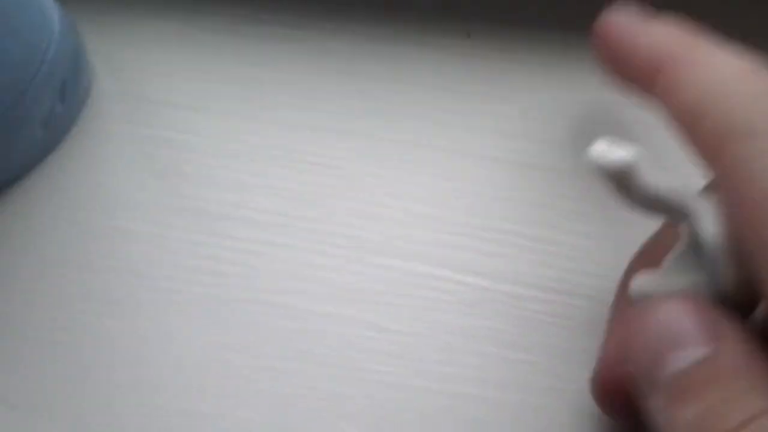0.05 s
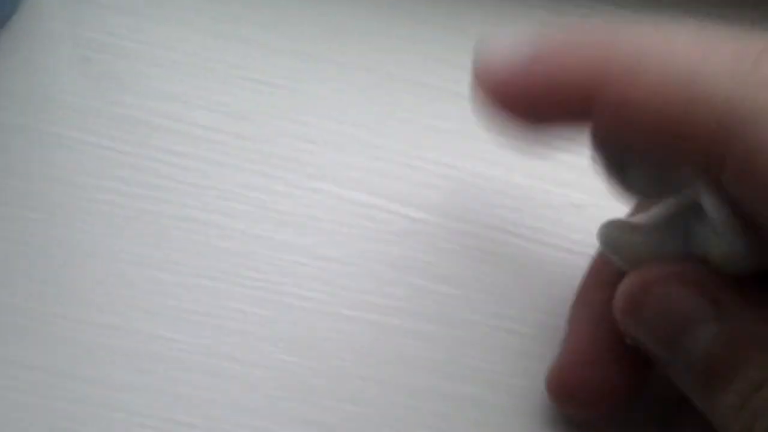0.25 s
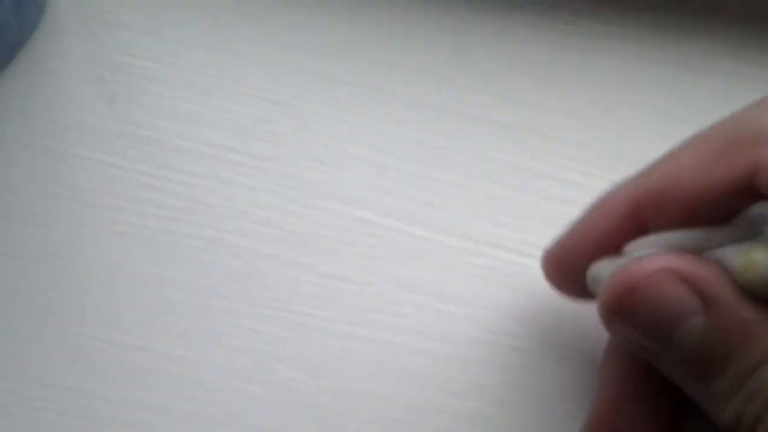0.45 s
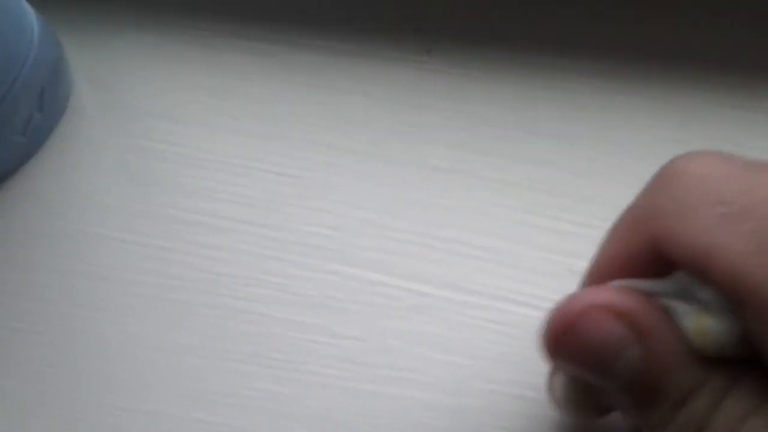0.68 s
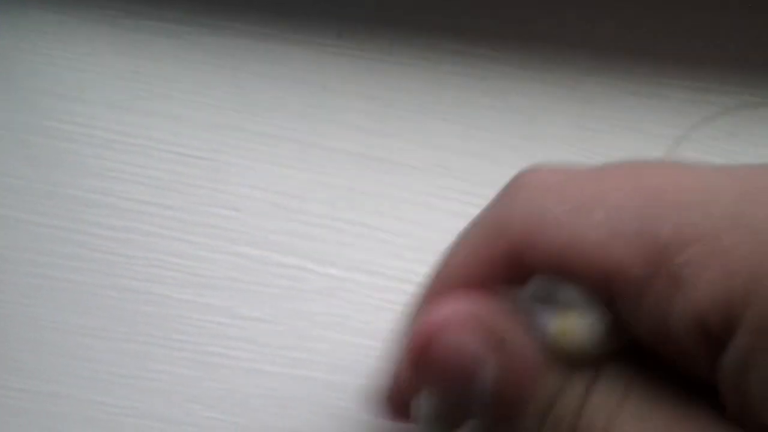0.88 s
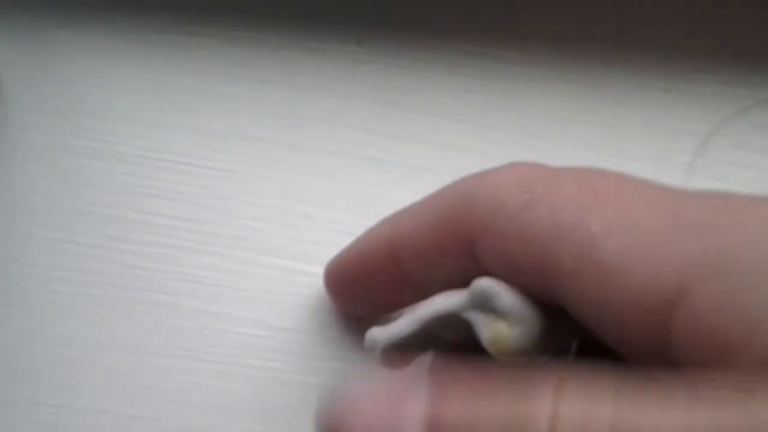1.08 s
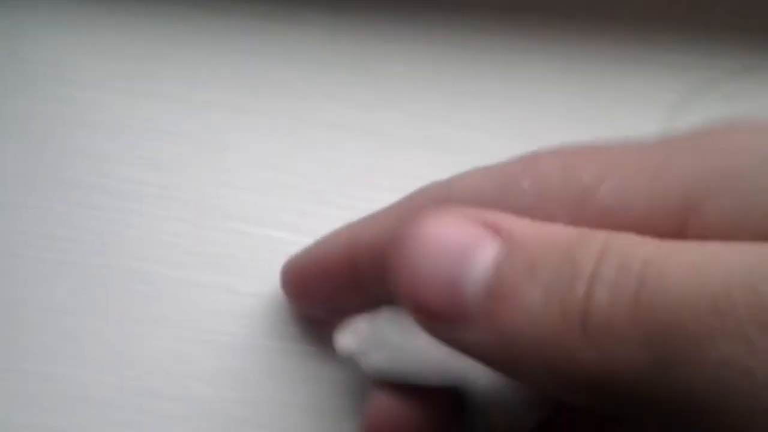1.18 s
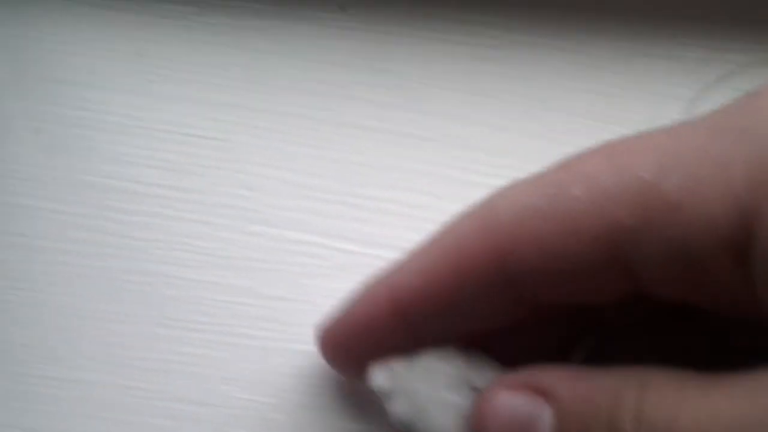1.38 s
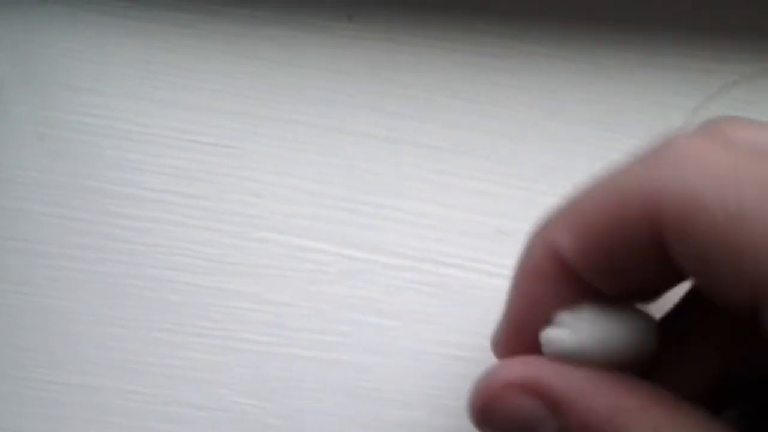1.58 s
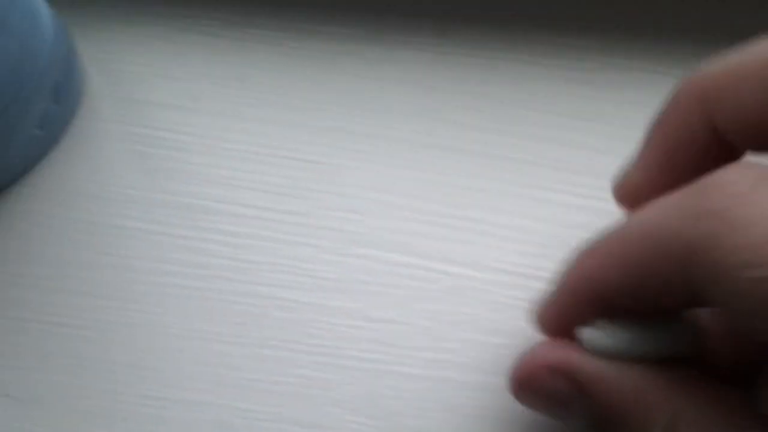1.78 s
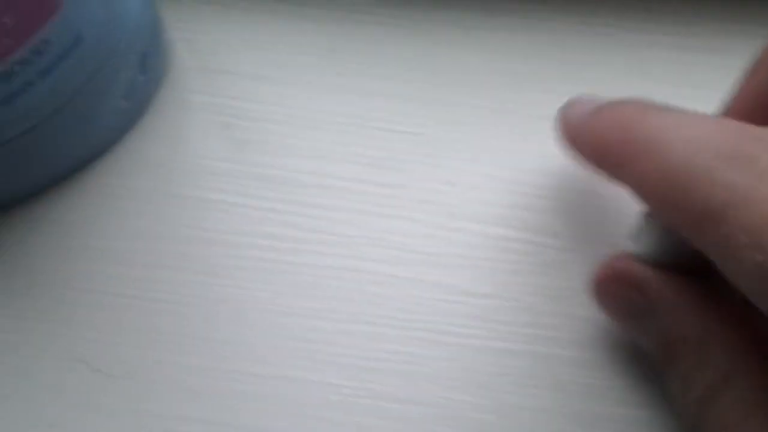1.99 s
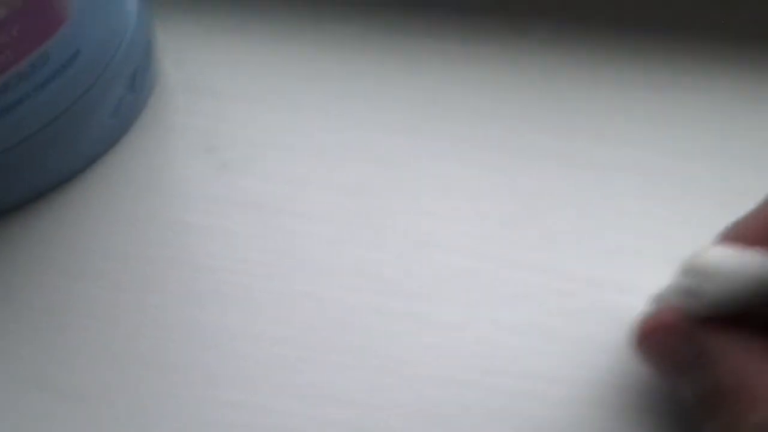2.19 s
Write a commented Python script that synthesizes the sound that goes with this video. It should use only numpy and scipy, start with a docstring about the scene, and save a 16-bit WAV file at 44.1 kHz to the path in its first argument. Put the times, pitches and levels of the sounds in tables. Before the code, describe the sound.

Slime crackles and pops as a hand squeezes it over a table. One sharp snap comes early, followed by fine sticky peeling, tiny clicks and soft finger rubbing, heard up close over faint room hiss.

```python
"""A small lump of slime, kneaded over a table close to the microphone in a quiet, dry room.
Trapped air bursts through thin films in one sharp snap, small clicks and soft pops.
Sticky skin peels off in fine crackles, with tiny bubbles fizzing among them.
Fingers rub and the hand bumps dully; behind them lie faint hiss, low rumble and a wavering hum."""
import sys
import numpy as np
from scipy import signal
from scipy.fft import rfft, irfft
from scipy.io import wavfile
from scipy.ndimage import uniform_filter1d

SR = 44100
rng = np.random.default_rng(int(sys.argv[2]) if len(sys.argv) > 2 else 0)


def bounce(signal):
    """Save signal as a 16-bit WAV file at the path given by the first command-line argument."""
    frames = np.transpose(np.atleast_2d(signal))
    limited = np.clip(frames, -1, 1)
    pcm = np.round(limited * 32767).astype(np.int16)
    wavfile.write(sys.argv[1], SR, pcm)


N = 99225

# room tone (frequency [Hz], relative level [dB])
ROOM_SPECTRUM = [(15, -52), (25, -10), (81, -1.5), (189, -3.5), (608, -16.5), (1720, -18), (2010, -20.5),
                 (4590, -28), (14400, -23)]
# rise and fall of the room's low end (time [s], gain [dB])
RUMBLE_GAINS = [(0, 5.5), (.85, -3), (.93, -18), (1.07, 2.5), (1.74, -3.5), (2.0, -1)]
# background hum (time [s], level [dB])
HUM_LEVELS = [(0, -66), (.5, -65), (.72, -78), (1.15, -77.5), (2.25, -73.5)]
# skin sliding on slime (time [s], level [dB])
RUB_LEVELS = [(0, -57.5), (.245, -55), (.32, -64.5), (.53, -67.5), (.60, -61.5), (.70, -66.5), (.85, -70.5),
              (.96, -56.5), (1.04, -56), (1.11, -64.5), (1.46, -69), (1.57, -62), (1.64, -65),
              (1.70, -52.5), (1.81, -59.5), (1.87, -56), (2.0, -61), (2.1, -65), (2.25, -63)]
# its rustle (frequency [Hz], relative level [dB])
RUB_SPECTRUM = [(70, -8), (280, 4), (600, -2.5), (1300, -6.5), (2800, -6), (4800, -5), (6500, -13.5),
                (11500, -13), (14400, -17)]
# hand bumps and finger taps (peak time [s], swell [s], fade [s], level [dB], pitch [Hz])
HAND_BUMPS = [(0.05, 0.13, 0.037, -52.5, 243), (0.1826, .0006, 0.005, -46.5, 1010),
              (1.037, 0.00083, 0.0045, -50, 476), (1.06, 0.0087, 0.029, -54, 149),
              (1.409, .01, .011, -53, 172), (1.669, 0.0011, 0.0054, -51.5, 730)]
# small bubbles clicking open (time [s], level [dB], ring pitch [Hz], treble cutoff [Hz])
BUBBLE_CLICKS = [(0.02, -18.5, 2930, 16000), (0.0782, -33.5, 5700, 9000), (.1128, -38, 5560, 9000),
                 (.183, -25.5, 4950, 14000), (0.1907, -33, 5200, 14000), (0.197, -27, 5600, 11000),
                 (0.393, -38, 5050, 11000), (.573, -32.5, 4870, 8040), (.896, -31.5, 3500, 6470),
                 (1.0346, -24, 5050, 6500), (1.037, -28, 5640, 7000), (1.0537, -37, 4000, 5000),
                 (1.0695, -38.5, 5700, 7500), (1.483, -45, 5210, 6800), (1.7506, -26.5, 4500, 7440),
                 (1.7585, -32, 4740, 9150), (1.8634, -30, 5200, 14000), (1.8673, -24.5, 5100, 14000),
                 (1.874, -29.5, 5230, 14000)]
# their crack (frequency [Hz], relative level [dB])
CLICK_SPECTRUM = [(100, -9.5), (1000, -19.5), (2000, -6), (3000, -9), (5000, 2), (6200, -6.5), (7800, -2.5),
                  (11500, -10), (14400, -7.5)]
# sticky skin peeling off (peak time [s], swell [s], fade [s], level [dB], resonance [Hz])
SKIN_PEELS = [(.2, 0.014, 0.056, -54.5, 5360), (0.253, 0.0049, 0.0041, -49, 5220),
              (0.395, 0.0046, 0.018, -55.5, 5200), (0.916, 0.021, 0.024, -55.5, 5000),
              (0.965, .013, 0.013, -45, 5400), (0.9782, .004, 0.0022, -47.5, 5100),
              (1.008, 0.014, 0.01, -49.5, 4650), (1.028, 0.01, 0.0089, -49, 4900),
              (1.176, 0.042, 0.028, -60, 7240), (1.399, .016, 0.013, -52, 4590),
              (1.522, 0.015, 0.073, -60, 4900), (1.763, 0.016, 0.012, -46.5, 4430),
              (1.85, 0.018, 0.054, -49, 4760)]
# its crackle (frequency [Hz], relative level [dB])
PEEL_SPECTRUM = [(100, -21), (1000, -8.5), (2200, -12.5), (3200, -3.5), (5300, -1), (6200, -8.5),
                 (7500, -6), (9700, -3), (12000, -10), (14400, -12.5)]
# crack of the big bubble (frequency [Hz], relative level [dB])
SNAP_SPECTRUM = [(60, -28), (240, -11.5), (600, -24.5), (1200, -19.5), (1950, -22), (2090, -32.5),
                 (2280, -11), (3450, 2), (4300, -3.5), (5000, 0), (6100, -9), (7000, -9), (8200, -16.5),
                 (8900, -10.5), (11600, -29.5), (12600, -22), (14400, -16)]
# its ring (frequency [Hz], level [dB], time to fall 60 dB [s])
SNAP_MODES = [(240, -56, 0.071), (2647, -31, 0.029), (3480, -34.5, .008), (5060, -30.5, 0.0139)]
# deeper air pockets opening (time [s], level [dB], starting pitch [Hz])
POCKET_POPS = [(1.0275, -53.5, 980), (1.231, -43, 1360), (1.669, -44.5, 2254), (1.9208, -40, 1660),
               (1.9319, -45, 1900), (1.9328, -40.5, 5420), (2.155, -50, 2940), (2.1552, -50, 1650)]

ROOM_DB, RUMBLE_BELOW_HZ, RUMBLE_WAVER_DB = -62, 119.5, 3.5
HUM_HZ, HUM_WAVER_DB = 209, 4.5
CLICK_Q, CLICK_RING_DB, CLICK_TEAR_DB = 5, 10, 2
LONGEST_TEAR_S = 0.00168  # decay of the loudest click; smaller films tear faster
PEEL_Q, PEEL_RING_DB, PEEL_FLUTTER_DB = 4.03, 11, 1
FIZZ_PER_S, FIZZ_HZ, FIZZ_OCTAVES, FIZZ_T60_S = 220, 4900, 0.29, 0.0032
FIZZ_DB = -8.5  # against the crackle
SNAP_AT_S, SNAP_DB = 0.23197, 9.5
COLLAPSE_DB, COLLAPSE_PEAK_S = -18, 0.00115  # level against the crack
FLUTTER_DB, FLUTTER_DECAY_S, FLUTTER_HZ = -53, 0.032, 2580
POP_T60_S, POP_ATTACK_S, POP_GLIDE_PER_S, POP_WET_DB = 0.018, 0.00053, 11, -8.5
TOP_HZ = 14650


def undb(db):
    return 10 ** (np.asarray(db) / 20)


def unit(x):
    return x / np.sqrt(np.mean(x ** 2))


def add(out, at, sound):
    """Mix a sound in from a given time."""
    i = max(int(at * SR), 0)
    out[i:i + len(sound)] += sound[:N - i]


def colour(x, spectrum, size=2048):
    """Shape a sound with a causal, unit-energy filter through the (Hz, dB) points."""
    hz, db = np.array(spectrum, float).T
    freqs = np.maximum(np.fft.rfftfreq(size, 1 / SR), 1)
    gain = undb(np.interp(np.log(freqs), np.log(hz), db))
    cepstrum = irfft(np.log(gain))
    cepstrum[1:size // 2] *= 2  # minimum phase keeps attacks sharp
    cepstrum[size // 2 + 1:] = 0
    impulse = irfft(np.exp(rfft(cepstrum)))
    return signal.fftconvolve(x, impulse / np.linalg.norm(impulse))[:len(x)]


def band(x, hz, q):
    """One resonance."""
    return signal.lfilter(*signal.iirpeak(min(hz, SR / 3), q, fs=SR), x)


def drift(per_s):
    """Smooth random drift with a spread of 1."""
    hold = max(int(SR / per_s), 1)
    steps = rng.standard_normal(N)[np.arange(N) // hold]
    return unit(uniform_filter1d(steps, hold))


def ring(t, hz, t60):
    """A sine that falls 60 dB in t60 seconds."""
    return np.sin(2 * np.pi * hz * t) * np.exp(-np.log(1000) * t / t60)


def swell(t, peak, rise, fade):
    """Exponential build-up to a peak and release after it."""
    return np.exp(np.minimum((t - peak) / rise, (peak - t) / fade))


def grains(per_s, spread_db):
    """Dense tiny ruptures of uneven size."""
    size = undb(spread_db * np.minimum(rng.exponential(size=N), 4))
    bursts = rng.random(N) < per_s / SR
    return unit(bursts * size * rng.choice([-1, 1], N))


def room_tone(t):
    """The room behind the hands: steady hiss, uneven rumble and a faint hum that wavers and fades."""
    pitch = HUM_HZ * (1 + 0.024 * drift(30.02))
    tone = np.sin(2 * np.pi * np.cumsum(pitch) / SR)
    wavering = unit(tone / undb(HUM_WAVER_DB * drift(5.7)))
    hum = undb(np.interp(t, *np.array(HUM_LEVELS).T)) * wavering
    air = unit(colour(rng.standard_normal(N), ROOM_SPECTRUM))
    rumble = signal.sosfiltfilt(signal.butter(2, RUMBLE_BELOW_HZ, fs=SR, output="sos"), air)
    hiss = air - rumble
    heave = undb(np.interp(t, *np.array(RUMBLE_GAINS).T) + RUMBLE_WAVER_DB * drift(14.07))
    return undb(ROOM_DB) * (hiss + rumble * heave) + hum


def rubbing(t):
    """Skin slides on slime with a soft, broad rustle that follows the pressure of the fingers."""
    db = np.interp(t, *np.array(RUB_LEVELS).T) + 1.5 * drift(59.78)
    return colour(grains(per_s=7400, spread_db=2.5) * undb(db), RUB_SPECTRUM)


def bumps(t):
    """Low thuds and short, dull taps of the hand working against the table."""
    out = np.zeros(N)
    for at, rise, fade, db, hz in HAND_BUMPS:
        thud = unit(band(band(rng.standard_normal(N), hz, q=0.96), hz, q=0.96))
        out += undb(db) * swell(t, at, rise, fade) * thud
    return out


def clicks(t):
    """A thin film breaks, tears longer the bigger it is, and rings its cavity; softer films are duller."""
    out, t = np.zeros(N), t[:SR // 20]
    loudest_db = max(row[1] for row in BUBBLE_CLICKS)
    for at, db, hz, cutoff_hz in BUBBLE_CLICKS:
        tear_s = LONGEST_TEAR_S * np.sqrt(undb(db - loudest_db))
        tear = rng.standard_normal(len(t)) * np.exp(-t / tear_s)
        push = (t == 0) + undb(CLICK_TEAR_DB) * tear / np.linalg.norm(tear)
        softened = signal.lfilter(*signal.butter(2, cutoff_hz, fs=SR), push)
        crack = colour(softened, CLICK_SPECTRUM)
        click = crack + undb(CLICK_RING_DB) * band(crack, hz, CLICK_Q)
        add(out, at, undb(db) * click * np.linalg.norm(push) / np.linalg.norm(click))
    return out


def peeling(t):
    """Crackle and fizz build as skin pulls and die as it lets go; the crackle rings the gap beneath."""
    ruptures = grains(per_s=12000, spread_db=1) * undb(PEEL_FLUTTER_DB * drift(220))
    crackle = colour(ruptures, PEEL_SPECTRUM)
    bubbles = undb(FIZZ_DB) * fizz(t)
    out = np.zeros(N)
    for at, rise, fade, db, hz in SKIN_PEELS:
        ringing = unit(crackle + undb(PEEL_RING_DB) * band(crackle, hz, PEEL_Q))
        out += undb(db) * swell(t, at, rise, fade) * unit(ringing + bubbles)
    return out


def fizz(t):
    """Tiny bubbles burst at random moments, each with its own size and pitch."""
    out = np.zeros(N)
    for when, size, pitch in rng.random((int(FIZZ_PER_S * N / SR), 3)):
        hz = FIZZ_HZ * 2 ** (FIZZ_OCTAVES * (2 * pitch - 1))
        add(out, when * t[-1], size * ring(t[:SR // 20], hz, FIZZ_T60_S))
    return unit(out)


def snap(t):
    """The big bubble bursts: one crack, a very short ring, and the film collapsing and fluttering out."""
    out, t = np.zeros(N), t[:SR // 4]
    collapse = rng.standard_normal(len(t)) * t * np.exp(-t / COLLAPSE_PEAK_S)
    push = (t == 0) + undb(COLLAPSE_DB) * collapse / np.linalg.norm(collapse)
    crack = undb(SNAP_DB) * colour(push, SNAP_SPECTRUM)
    film = unit(band(band(rng.standard_normal(len(t)), FLUTTER_HZ, q=1.7), FLUTTER_HZ, q=2.3))
    flutter = undb(FLUTTER_DB) * film * np.exp(-t / FLUTTER_DECAY_S)
    ringing = sum(undb(db) * ring(t, hz, t60) for hz, db, t60 in SNAP_MODES)
    add(out, SNAP_AT_S, crack + flutter + ringing)
    return out


def pops(t):
    """Air pockets ring briefly, rising in pitch as they open, with a wet smack."""
    out, t = np.zeros(N), t[:SR // 20]
    attack = 1 - np.exp(-t / POP_ATTACK_S)
    decay = np.exp(-np.log(1000) * t / POP_T60_S)
    for at, db, hz in POCKET_POPS:
        smack = unit(band(rng.standard_normal(len(t)), hz, q=1)) * decay
        tone = ring(t, hz * (1 + POP_GLIDE_PER_S * t / 2), POP_T60_S)
        add(out, at, undb(db) * attack * (tone + undb(POP_WET_DB) * smack))
    return out


def scene():
    """Slime up close, room tone behind; one microphone feeds both channels."""
    t = np.arange(N) / SR
    slime = snap(t) + clicks(t) + pops(t) + peeling(t) + rubbing(t) + bumps(t)
    return np.tile(slime + room_tone(t), (2, 1))


def record(dry):
    """The microphone signal, with the highest treble cut steeply."""
    return signal.sosfilt(signal.ellip(10, .2, 60, TOP_HZ, fs=SR, output="sos"), dry)


dry = scene()
out = record(dry)
bounce(out)
```